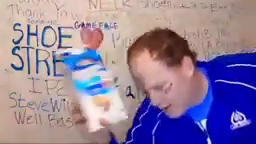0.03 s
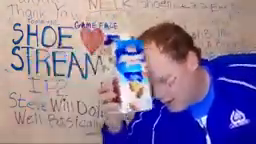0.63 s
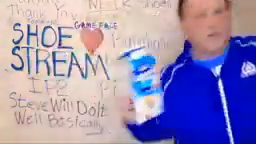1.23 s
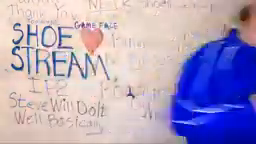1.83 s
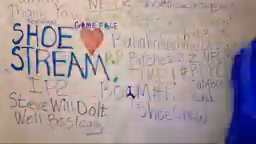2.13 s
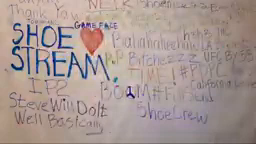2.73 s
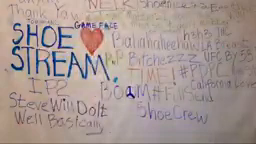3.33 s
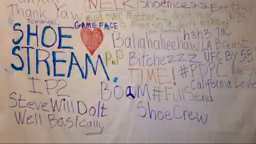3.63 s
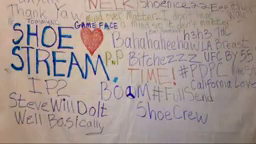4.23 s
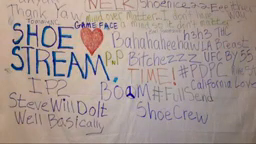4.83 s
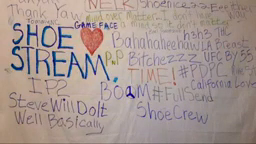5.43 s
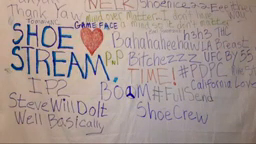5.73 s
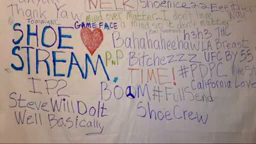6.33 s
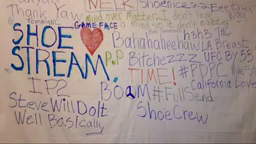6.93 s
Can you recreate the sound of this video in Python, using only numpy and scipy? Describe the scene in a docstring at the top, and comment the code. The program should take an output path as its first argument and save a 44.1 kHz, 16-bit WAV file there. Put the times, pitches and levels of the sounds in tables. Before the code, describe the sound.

Two sharp, sloshing knocks on a drink carton, soft bumps moving off, then a refrigerator knocking, creaking and closing in a small room.

```python
"""Over a soft hum, a full drink carton is jerked and knocked twice close by; each time the drink slaps
a wall and falls back. A jacket rustles and soft bumps move away through a small, echoing room.
Further off, things knock in a refrigerator, its door creaks, then squeaks and rattles shut.
Four times along the way the sound briefly dips or cuts out."""
import sys
import numpy as np
from scipy import signal
from scipy.fft import rfft, irfft
from scipy.io import wavfile
from scipy.ndimage import uniform_filter1d, minimum_filter1d

SR = 44100
rng = np.random.default_rng(int(sys.argv[2]) if len(sys.argv) > 2 else 0)


def to_wav(sig):
    """Store sig (one row per channel, or 1-D mono) as 16-bit WAV at the path in sys.argv[1].

    Samples outside -1..1 are clipped; the rate is SR.
    """
    pcm = np.clip(np.atleast_2d(sig), -1, 1) * 32767
    pcm = np.round(pcm).astype(np.int16)
    wavfile.write(sys.argv[1], SR, pcm.T)  # frames by channels


N = 316638
T = np.arange(N) / SR
TAIL = T[:SR // 2]  # the half second in which one short sound dies away

# Blows on the carton. Each row: start in seconds, level in dB, dent pitch in Hz, crack in dB above
# the blow, crack brightness in dB per octave, echo in dB above the blow.
CARTON_BLOWS = [(-0.014, -7.5, 963, -9.5, 1, -10), (0.0098, -23.5, 380, -43, 1.5, -14),
                (0.6, -41, 604.6, -11.5, 0, -5.5), (0.6074, -12.5, 379.5, -19.5, 3.5, -9),
                (0.614, -21.5, 450, -26, 0, -8.5), (0.6208, -4.5, 1188, -8.5, -1, -14.5),
                (0.623, -10.5, 262.5, -20.5, 0, -10)]
# Tones that ring at each blow: low room resonances and higher cardboard tones. Each row: pitch in Hz,
# relative level in dB, ring time in seconds. A ring time (t60) is how long a sound takes to fade by 60 dB.
BLOW_TONES = [(144, -17, 0.02), (234, 1, 0.073), (295, -1, 0.028), (364.5, -1.5, .04), (502, 1, 0.048),
              (683, -7, 0.05), (805, -6.5, 0.038), (972, -1.5, 0.031), (1107, -4, 0.034), (1310, 2, .024),
              (1480, -8, .03), (1755, -9.5, 0.024), (2110, -9.5, 0.052), (2487, 0.5, 0.018)]
# Shakes of the drink. Each row: time of the slap in seconds, its strength in dB, seconds until the
# wave falls back, its strength in dB.
DRINK_SHAKES = [(0.0, -16, 0.2, -39.5), (0.634, -21.5, 0.165, -40)]
# Single splashes on the cardboard. Each row: time in seconds, strength in dB.
DRINK_SPLASHES = [(0.283, -62), (0.371, -60.5), (0.683, -59), (0.771, -64), (0.868, -63.5), (0.947, -66)]
# The compressor's hum. Each row: pitch in Hz, level in dB.
HUM_TONES = [(53.8, -78.5), (91.5, -81.5)]
# Steps and handled things. Each row: start in seconds, strength in dB, pitch in Hz, ring time in
# seconds, scuff in dB above the bump.
SOFT_BUMPS = [(0.5, -60.5, 382, 0.079, -21), (1.06, -54.5, 961, 0.01, 1.5), (1.797, -63.5, 810, 0.015, 3),
              (2.248, -47, 190, 0.11, -2.5), (2.263, -52.5, 350, 0.042, -18), (2.391, -50, 289, 0.049, -8),
              (2.464, -58.5, 317, 0.06, -3), (2.56, -55.5, 366, 0.24, -8.5), (2.858, -66.5, 287.3, 0.1, 8),
              (3.405, -68, 220.6, 0.16, -1.5), (3.485, -66.5, 200.2, 0.1, -14),
              (6.009, -52.5, 60.3, 0.061, 0)]
# Arm strokes in the jacket. Each row: time and half length in seconds, rub and swish in dB.
ARM_STROKES = [(0.57, 0.043, -70.5, -75), (1.43, 0.086, -70, -76), (1.616, .07, -61, -72),
               (2.022, 0.033, -54, -62.5), (2.47, .03, -67.5, -78), (2.68, .03, -69, -75),
               (2.868, .03, -60, -72), (3.017, 0.2, -65, -76.5), (3.757, 0.054, -73.5, -80),
               (3.938, 0.073, -72.5, -80), (5.5, .2, -75.5, -86), (6.016, .015, -68, -69),
               (7.1, .08, -71.5, -80)]
# Refrigerator knocks. Each row: start in seconds, rattle length in milliseconds, cabinet and shelf
# strength in dB, shelf pitch in Hz, click strength in dB, its brightness in dB per octave, its pitch in Hz.
FRIDGE_KNOCKS = [(2.187, 7.5, -67, -59, 1300, -58, -2, 8500), (3.18, 11.3, -44.5, -43, 1344, -49, -3, 3730),
                 (4.82, 9.2, -80, -68, 1313, -71.5, 9, 8900),
                 (5.469, 11.4, -88, -73, 1300, -65.5, -2.5, 2280),
                 (6.076, 18, -56.5, -53.5, 1280, -63.5, -8, 2220),
                 (6.106, 10.5, -50, -54, 1210, -75, 0.5, 2400),
                 (6.196, 15.4, -52.5, -47, 1120, -50.5, -2.5, 2250),
                 (6.356, 7.2, -51, -41.5, 1116, -50, -1, 2250),
                 (6.368, 5.2, -52.5, -45.5, 1230, -53.5, 3, 2320),
                 (6.4798, 9.6, -41.5, -36, 1156, -37.5, -5.5, 2420),
                 (6.486, 4.2, -59, -30.5, 1250, -35.5, 2, 2480),
                 (6.641, 20, -63.5, -60, 1225, -64.5, 0, 2322),
                 (6.778, 22, -60.5, -56, 1087, -66.5, -1, 2500),
                 (6.877, 14, -67, -65.5, 1230, -72.5, -3, 2660),
                 (7.034, 34, -76.5, -78, 1190, -78, 3, 2500), (7.145, 19, -67, -71.5, 1170, -79, 2, 2480)]
# Tones of the cabinet. Each row: pitch in Hz, relative level in dB, ring time in seconds.
CABINET_MODES = [(198, -33, 0.13), (296, -3, 0.11), (378, 6.5, 0.076), (451, 3, 0.081), (556, -9, 0.16)]
# Tones of a shelf. Each row: multiple of its pitch, relative level in dB, ring time in seconds.
SHELF_MODES = [(.60, 3.5, 0.013), (.81, -4, 0.014), (0.951, -0.5, 0.035), (1.02, 0, 0.033),
               (1.118, -7, 0.031), (1.2, -17, 0.021), (1.7, -6.5, 0.0038)]
# How long the room echoes. Each row: frequency in Hz, ring time in seconds.
ROOM_RING_TIMES = [(100, .48), (260, .39), (1300, .33), (2600, .28), (5000, .235), (13000, .21)]
# Brief drop-outs. Each row: start in seconds, end in seconds, level change in dB.
DROPOUTS = [(.949, 1.057, -90), (3.805, 3.853, -12), (5.859, 6.007, -90), (6.83, 6.875, -6)]

# Tone colours, from bass to treble. Each row: frequency in Hz, relative level in dB.
CRACK_COLOUR = [(100, -31), (300, -11.5), (1200, -2.5), (1900, -3.5), (2300, 3), (2650, 7.5), (3000, 0),
                (3400, 1), (3800, -8.5), (4600, -4), (5700, -9), (8000, -15.5), (11000, -22), (16000, -29)]  # cardboard cracking
GULP_COLOUR = [(70, -19.5), (150, -1), (230, -1.5), (350, -1), (600, -9), (900, -9.5), (1300, -6),
               (1800, -16.5), (2600, -21.5), (3600, -30), (8000, -49)]  # air pockets in the drink
SPRAY_COLOUR = [(700, -16.5), (2300, 3), (3500, 0), (5500, -5), (7400, -11.5), (8300, -3.5), (9500, -11),
                (16000, -17.5)]  # droplets
AIR_COLOUR = [(15, -41.5), (25, -13), (43, -5.5), (97, -6), (206, -12), (242, -11.5), (326, -21),
              (405, -15.5), (659, -18.5), (1520, -24.5), (2760, -34), (3430, -30.5), (6050, -38.5),
              (8590, -35.5), (16000, -40)]  # room air
SCUFF_COLOUR = [(70, -14), (170, -2.5), (380, -2), (700, -5), (1200, -4), (1800, -15), (2800, -18.5),
                (5000, -27), (14000, -45.5)]  # the scuff of a bump
RUB_COLOUR = [(100, -20.5), (300, -10), (430, -1.5), (560, -7), (800, -14), (1280, -4), (1600, -13.5),
              (3000, -15), (6000, -28.5), (16000, -50)]  # dull cloth rub
SWISH_COLOUR = [(1000, -19.5), (3500, 4.5), (5600, -2), (8200, 0), (11000, -8), (16000, -14.5)]  # bright cloth swish
CLICK_COLOUR = [(100, -30), (400, -45), (1200, -5), (1900, 5), (2600, 3), (3400, -1), (5000, -4),
                (7200, -5), (8200, -5), (9800, -11), (11200, -17), (16000, -22.5)]  # loose refrigerator parts
HINGE_COLOUR = [(600, -4), (1200, -4.5), (1900, -4.5), (2250, -1), (2900, -11), (4000, -16.5), (6000, -21),
                (12000, -24)]  # the door's creak
ECHO_COLOUR = [(60, -9.5), (220, -2.5), (350, -1.5), (600, -1.5), (1200, -1.5), (2500, -2), (4000, -3.5),
               (7000, -3), (8300, 1), (15000, 0)]  # the room's echoes

WALK_S, WALK_RISE_S, WALK_FALL_S = 1.7, 1, 1  # walking off is loudest at WALK_S, then fades with distance


def undb(db):
    """Turn decibels into a number to multiply by."""
    return 10 ** (np.asarray(db) / 20)


def level(x, db):
    """Set the average (rms) level of a lasting sound."""
    return x * undb(db) / np.sqrt(np.mean(x ** 2))


def burst(x, db):
    """Set the level of a short sound as if its energy lay within 10 ms."""
    return x * undb(db) * np.sqrt(SR / 100 / np.sum(x ** 2))


def at(points, hz):
    """Read between the rows of a frequency table, with octaves evenly spaced."""
    row_hz, value = np.transpose(points)
    return np.interp(np.log(np.maximum(hz, 1)), np.log(row_hz), value)


def through(x, response):
    """Make every sample of a sound set off the given ring or echo."""
    return signal.fftconvolve(x, response)[:len(x)]


def colour(x, points, tilt_db=0):
    """Give a sound a tone colour; a positive tilt, in dB per octave, brightens it."""
    size = 4096
    hz = np.maximum(np.fft.rfftfreq(size, 1 / SR), 1)
    curve_db = at(points, hz) + tilt_db * np.log2(np.maximum(hz, 1000) / 3000)
    cepstrum = irfft(np.log(undb(curve_db)))
    # fold the filter so that it rings only after a sound, never before
    cepstrum[1:size // 2] *= 2
    cepstrum[size // 2 + 1:] = 0
    return through(x, irfft(np.exp(rfft(cepstrum))))


def fade(t60):
    """A curve that falls by 60 dB in t60 seconds."""
    return np.exp(-np.log(1000) * TAIL / max(t60, 1e-3))


def swell(s, rise_s, fall_s):
    """A curve that grows to 1 at time s and then dies away."""
    return np.exp(-(np.minimum(T - s, 0) / rise_s) ** 2 - np.maximum(T - s, 0) / fall_s)


def ring(modes):
    """Fading tones that ring after a tap, with little sound below the lowest one."""
    swing = sum(undb(db) * np.sin(2 * np.pi * hz * TAIL) * fade(t60) for hz, db, t60 in modes)
    return signal.sosfilt(signal.butter(3, 0.58 * modes[0][0], "high", fs=SR, output="sos"), swing)


def add(out, s, x):
    """Mix a sound in at s seconds."""
    start = int(round(s * SR))
    x, start = x[max(-start, 0):], max(start, 0)
    out[start:start + len(x)] += x[:N - start]


def grains(per_s, spread_db, size=N):
    """Tiny random taps of uneven strength."""
    taps = (rng.random(size) < per_s / SR) * rng.choice([-1, 1], size)
    return taps * undb(spread_db * rng.standard_normal(size))


def room(build_s=0.0014):
    """Echoes for one spot in the room: bands of fading noise, with the treble dying first."""
    noise, hz = rfft(rng.standard_normal(len(TAIL))), np.fft.rfftfreq(len(TAIL), 1 / SR)
    edges = np.r_[0, np.geomspace(120, SR / 2, 17)]
    out = 0
    for lo, hi in zip(edges, edges[1:]):
        band = irfft(noise * ((hz >= lo) & (hz < hi)), len(TAIL))
        band *= fade(at(ROOM_RING_TIMES, (lo + hi) / 2))
        band *= 1 - np.exp(-(TAIL / build_s) ** 2)
        out = out + band * np.sqrt((hi - lo) * 2 / SR / np.sum(band ** 2))  # equal energy per Hz
    return colour(out, ECHO_COLOUR)


def placed(x, direct_db, room_db):
    """The sound that arrives straight, plus its echoes."""
    return undb(direct_db) * x + undb(room_db) * through(x, room())


def carton(crack_t60=0.013, crumple=0.16, dent_q=1.1):
    """Each blow dents a wall and the cardboard cracks; soft dents sound low, a hard edge sounds high."""
    out, tones = np.zeros(N), ring(BLOW_TONES)
    for s, db, dent_hz, crack_db, tilt_db, room_db in CARTON_BLOWS:
        thud = signal.lfilter(*signal.iirpeak(dent_hz, dent_q, fs=SR), tones)
        snap = crumple * rng.standard_normal(len(TAIL)) * fade(crack_t60)
        snap[0] += 1
        crack = burst(colour(snap, CRACK_COLOUR, tilt_db), db + crack_db)
        add(out, s, placed(burst(thud, db) + crack, 0, room_db))
    return out


def drink(slosh_s=1.1, cycles=14, glide=0.17, slap_spray_db=-25.5, wave_spray_db=-14, lead_s=0.035):
    """The drink slaps a wall and falls back. Air pockets ring and rise in pitch; droplets patter."""
    slosh = patter = 0
    rise_s, fall_s = 0.093, 0.075  # the wave that falls back
    for s, slap_db, back_s, wave_db in DRINK_SHAKES:
        slap = undb(slap_db) * swell(s, rise_s=0.012, fall_s=0.025)
        wave = undb(wave_db) * swell(s + back_s, rise_s, fall_s) * (T > s)
        early_drops = undb(wave_db + wave_spray_db) * swell(s + back_s - lead_s, rise_s / 2, fall_s)
        slosh += slap + wave
        patter += undb(slap_spray_db) * slap + early_drops
    patter += sum(undb(db) * swell(s, rise_s=0.0079, fall_s=0.01) for s, db in DRINK_SPLASHES)
    pockets = np.zeros(N)
    for when, pitch, strength in rng.random((700, 3)):
        hz = 150 * 20 ** pitch  # starts between 150 and 3000 Hz
        t = TAIL[:int(2 * cycles / hz * SR)]
        age = t * hz / cycles
        pocket = np.sin(2 * np.pi * hz * t * (1 + glide * age)) * np.exp(-np.log(1000) * age)
        add(pockets, when * slosh_s, undb(7.7 * strength) * hz * pocket)
    span = int(slosh_s * SR)
    gulps = level(colour(pockets[:span], GULP_COLOUR), 0)
    spray = level(colour(grains(1300, 4, size=span), SPRAY_COLOUR), 0)
    wet = gulps * slosh[:span] + spray * patter[:span]
    return placed(np.pad(wet, (0, N - span)), direct_db=-0.61, room_db=-5.5)


def air_and_hum(air_db=-72, wanders_per_s=2.5):
    """Soft room air wanders a little in level while the compressor hums low."""
    steps = rng.standard_normal(64)
    wander_db = -1.98 * np.interp(T * wanders_per_s, np.arange(len(steps)), steps)
    air = level(colour(rng.standard_normal(N), AIR_COLOUR), air_db) * undb(wander_db)
    hum = sum(level(np.sin(2 * np.pi * (hz * T + rng.random())), db) for hz, db in HUM_TONES)
    return air + hum


def bumps(scuff_t60=0.15):
    """Steps and handled things each give one dull ring and a short scuff."""
    out = np.zeros(N)
    for s, db, hz, t60, scuff_db in SOFT_BUMPS:
        scuff = colour(rng.standard_normal(len(TAIL)) * fade(scuff_t60), SCUFF_COLOUR)
        bump = burst(ring([(hz, 0, t60)]), db) + burst(scuff, db + scuff_db)
        add(out, s, placed(bump, direct_db=1.56, room_db=0.7))
    return out


def jacket(walk_rub_db=-67, walk_swish_db=-73.5):
    """Cloth rubs in many tiny slips while walking off; arm strokes add more rub and a bright swish."""
    walking = swell(WALK_S, WALK_RISE_S, WALK_FALL_S)
    rub, swish = undb(walk_rub_db) * walking, undb(walk_swish_db) * walking
    for s, half_s, rub_db, swish_db in ARM_STROKES:
        stroke = swell(s, half_s, half_s)
        rub = np.hypot(rub, undb(rub_db) * stroke)
        swish = np.hypot(swish, undb(swish_db) * stroke)
    slips = placed(grains(1800, 3), direct_db=0, room_db=-2.5)
    return level(colour(slips, RUB_COLOUR), 0) * rub + level(colour(slips, SWISH_COLOUR), 0) * swish


def carton_thumps(hz=185, t60=0.036, db=-73):
    """The carried carton thumps faintly at random, fading with distance."""
    knocks = through(grains(per_s=9, spread_db=2.5), ring([(hz, 0, t60)]))
    return level(placed(knocks, direct_db=0, room_db=2), db) * swell(WALK_S, WALK_RISE_S, WALK_FALL_S)


def refrigerator(direct_db=0.6, click_ring=1.1, click_q=3, boost_db=6.0):
    """Each knock is a quick rattle of loose parts that clicks and sets cabinet and shelves ringing."""
    out, cabinet_ring = np.zeros(N), ring(CABINET_MODES)
    for s, length_ms, cabinet_db, shelf_db, shelf_hz, click_db, tilt_db, click_hz in FRIDGE_KNOCKS:
        length_s = length_ms / 1000
        contacts = grains(8000, 3.7, size=len(TAIL)) * TAIL / length_s * np.exp(-(TAIL / length_s) ** 2)
        # the echoes build up for as long as the rattle lasts
        rattle = burst(contacts, direct_db) + burst(room(length_s), 0)
        cabinet = burst(through(rattle, cabinet_ring), cabinet_db)
        shelf_ring = ring([(ratio * shelf_hz, db, t60) for ratio, db, t60 in SHELF_MODES])
        shelf = burst(through(rattle, shelf_ring), shelf_db)
        click = colour(rattle, CLICK_COLOUR, tilt_db)
        click = click + click_ring * signal.lfilter(*signal.iirpeak(click_hz, click_q, fs=SR), click)
        add(out, s, cabinet + shelf + burst(click, click_db))
    return undb(boost_db) * out


def door_creak(start_s=4.08, length_s=0.56, slips_per_s=40, slowing=0.53, fade_db_per_s=11.5):
    """The hinge creaks in uneven slips that slow down and fade as the door swings."""
    age = np.clip(T - start_s, 0, length_s)
    uneven = np.repeat(rng.standard_normal(N // 1000 + 1), 1000)[:N]
    rate = slips_per_s * np.exp(-slowing * age) * np.exp(0.4 * uneven)
    phase = np.cumsum(rate) / SR % 1
    pulses = 0.25 + np.exp(-phase / 0.17)  # each slip starts sharply, then eases
    slips = level(colour(grains(8000, 2.54) * pulses, HINGE_COLOUR), 0)
    return slips * undb(-69 - fade_db_per_s * age) * (age > 0) * (age < length_s)


def door_squeak(start_s=5.703, rise_s=0.009, hz=4040, roughness=0.04):
    """The hinge gives one tiny squeak, made rough by its trembling pitch."""
    jitter = np.repeat(rng.standard_normal(N // 64 + 1), 64)[:N]
    tone = np.sin(2 * np.pi * np.cumsum(hz * (1 + roughness * jitter)) / SR)
    return undb(-70.5) * tone * np.exp(-((T - start_s) / rise_s - 1) ** 2)


def scene():
    """All the sounds meet at one microphone."""
    mix = carton() + drink() + refrigerator() + bumps() + carton_thumps() + jacket()
    hinge = placed(door_creak() + door_squeak(), direct_db=-1.6, room_db=-4)
    return (mix + hinge + air_and_hum())[None]


def record(dry, top_hz=15900):
    """The sound drops out briefly, a fast limiter holds the loudest blow and the top treble is cut."""
    gain = np.ones(N)
    for start, end, db in DROPOUTS:
        gain[(T > start) & (T < end)] = undb(db)
    sound = dry * uniform_filter1d(gain, size=64)
    safe_gain = 1 / np.maximum(abs(sound), 1)
    limiter = uniform_filter1d(minimum_filter1d(safe_gain, size=45), size=45)
    return signal.sosfilt(signal.ellip(10, .2, 80, top_hz, fs=SR, output="sos"), sound * limiter)


dry = scene()
out = record(dry)
to_wav(out)
```